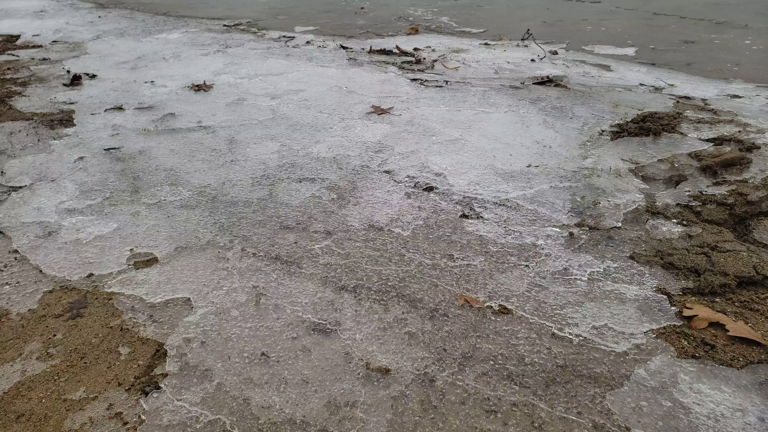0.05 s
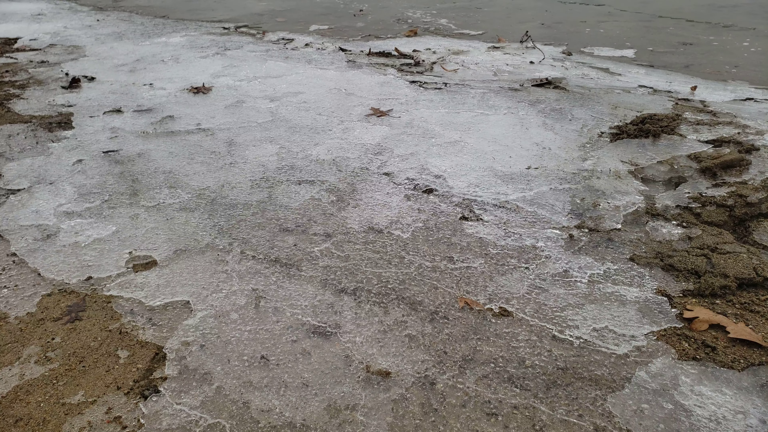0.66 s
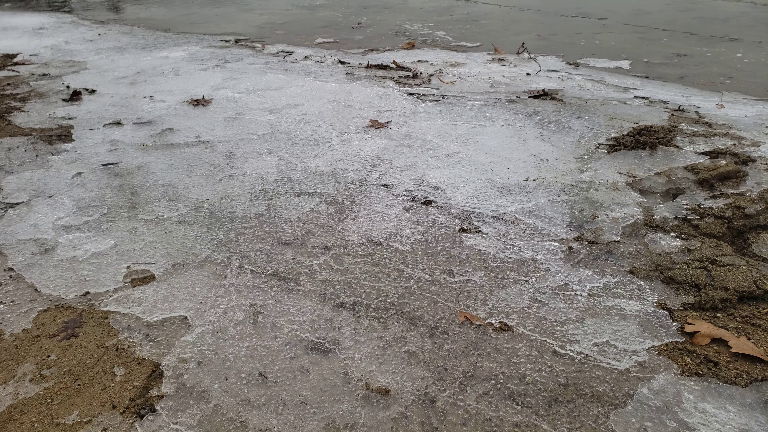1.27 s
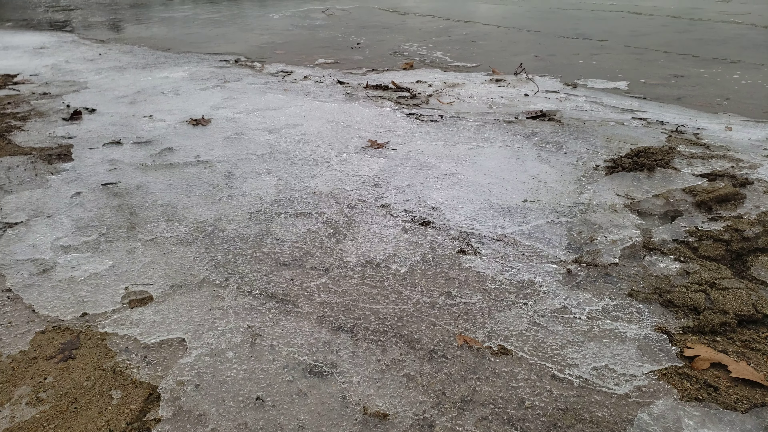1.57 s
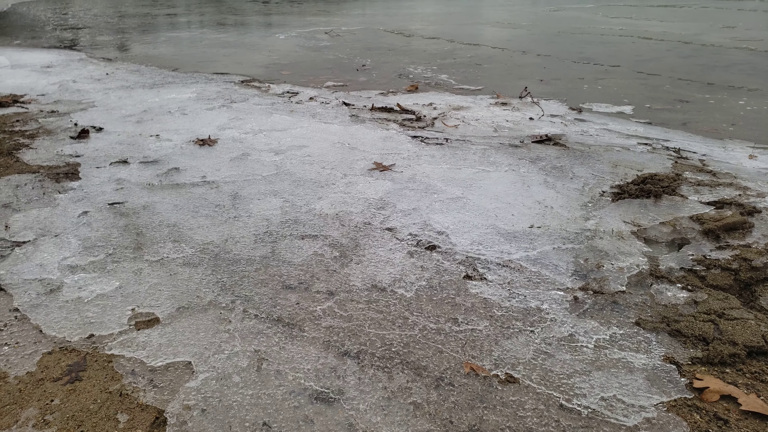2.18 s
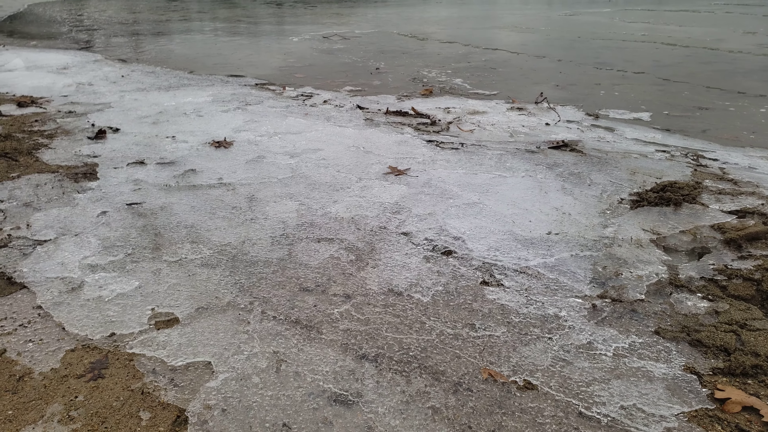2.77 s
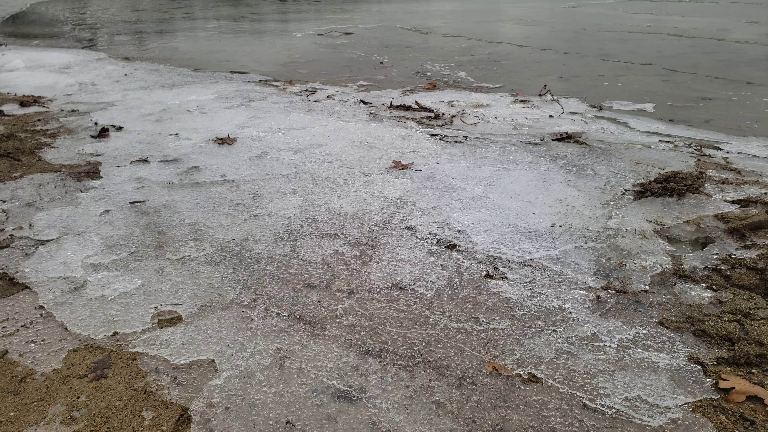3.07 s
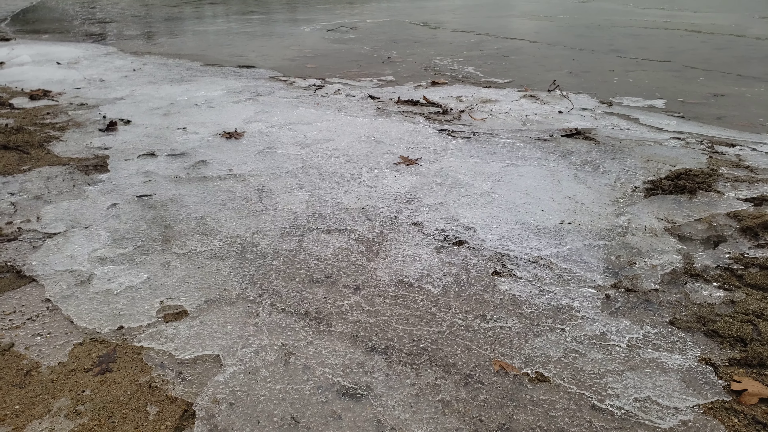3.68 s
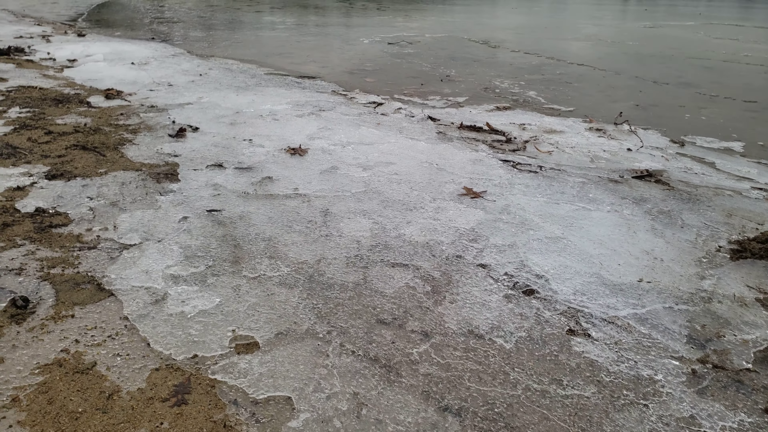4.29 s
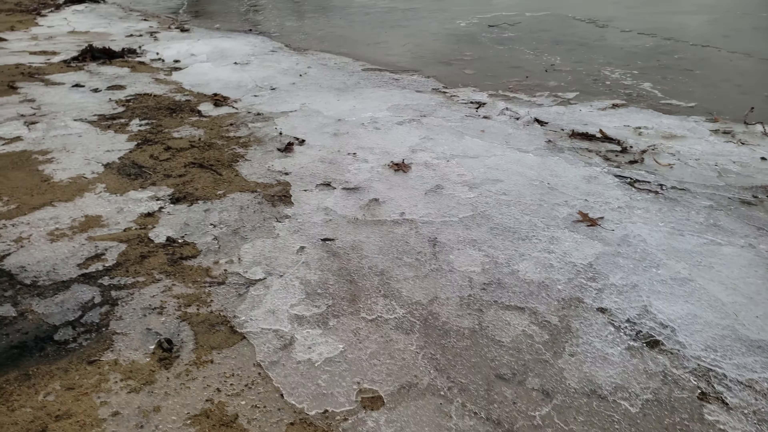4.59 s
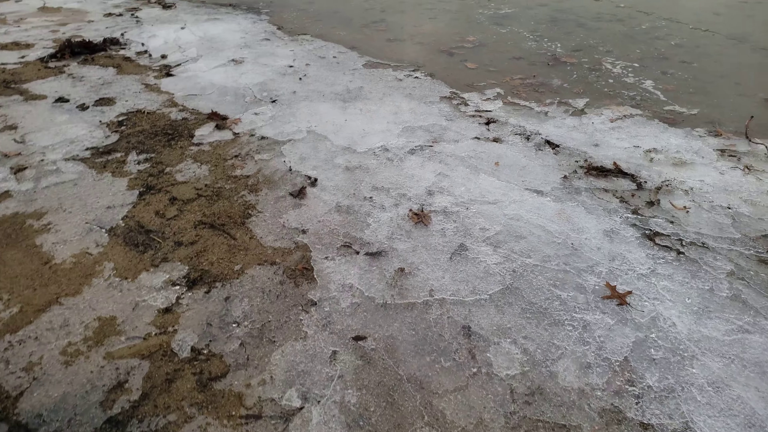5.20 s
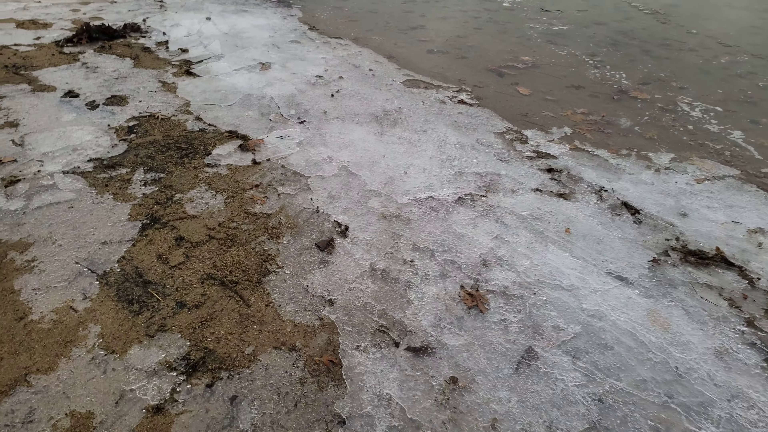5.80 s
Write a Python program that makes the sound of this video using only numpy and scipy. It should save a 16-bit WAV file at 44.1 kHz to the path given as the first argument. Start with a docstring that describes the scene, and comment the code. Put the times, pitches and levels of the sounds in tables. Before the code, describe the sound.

Low wind rumble comes in puffs on a microphone held near thin ice at the edge of a lake. Throughout, sleet-like grains land in bright, glassy ticks and little crackling flurries, with occasional faint chinks and dull knocks. Water gurgles quietly along the ice. Toward the end the gusts return, the gurgling and a distant wash swell slightly, and loose ice shards jostle.

```python
"""Icy grains on a frozen lake shore

Close to thin ice, on a hand-held camera with two microphone ports. Fine icy grains, likely sleet, tick
and crackle on ice, ground and camera, among chinks, dull knocks and two handling clicks. Water gurgles,
and a wash of distant air and water swells at the end. Gusts rumble on each port separately."""
import sys
import numpy as np
from scipy import signal
from scipy.fft import rfft, irfft, next_fast_len
from scipy.io import wavfile
from scipy.ndimage import uniform_filter1d

SR = 44100
rng = np.random.default_rng(int(sys.argv[2]) if len(sys.argv) > 2 else 0)


def put_to_file(sound):
    """Save the sound as 16-bit audio at rate SR, in the file named by the first command-line argument."""
    columns = np.atleast_2d(sound).T  # one column per channel
    safe = np.clip(columns, -1, 1)
    whole_steps = np.round(safe * 32767)
    wavfile.write(sys.argv[1], SR, whole_steps.astype(np.int16))


N = 257984
TIME = np.arange(N) / SR

# how strongly the icy grains crackle: time_s, relative_db
CRACKLE_LEVEL = [(0.12, -52.5), (0.6, -48.5), (1.0, -47), (1.3, -46), (1.8, -45), (2.42, -49),
                 (2.55, -53.5), (2.7, -49.5), (2.95, -51.5), (3.7, -51), (4.4, -52.5), (4.8, -45.5),
                 (5.05, -50.5), (5.43, -50.5), (5.58, -46), (5.85, -48.5)]
# flurries, when the crackle swells briefly: peak_s, boost_db
FLURRY_PEAKS = [(0.171, 11), (0.39, 6.5), (1.15, 1), (1.25, 3), (1.51, 2.5), (1.74, 1.5), (3.13, 5),
                (3.38, 5), (3.57, 2), (3.67, 4.5), (3.93, 2.5), (4.08, 2.5), (4.22, 5.5), (4.33, 4),
                (4.51, 5.5), (5.22, 2)]
# colour of the crackle: frequency_hz, relative_db
CRACKLE_SPECTRUM = [(1500, -4.5), (2400, -7), (3300, -7), (4300, -2), (5400, -4), (6800, -1.5),
                    (8400, -11.5), (9700, -6.5), (11000, -2), (12100, 1.5), (13500, 0), (15600, -6)]
def crackle(level_db=3.0, ticks_db=-7.0, clicks_db=-3.5, far_db=-4.0, clump_db=4.5):
    """Icy grains land near the microphone as glassy ticks or dry clicks; far ones merge into a fizz."""
    ticks = shower(count=2000, low_hz=2500, high_hz=16000, decay_s=.0016, octaves=.07, spread_db=3.6,
                   lag_ms=0.178, lag_spread_ms=0.492, scatter_db=-10.5, size=768)
    clicks = shower(count=1700, low_hz=2900, high_hz=15700, decay_s=0.00067, octaves=1.0, spread_db=1.0,
                    lag_ms=0.186, lag_spread_ms=0.298, scatter_db=-6.5, size=512)
    # the dry clicks come in clumps
    clumps = unit_rms(uniform_filter1d(rng.standard_normal(N), size=800))
    clicks *= gain_of(clump_db * np.minimum(clumps, 2))
    far = gain_of(far_db) * rng.standard_normal((2, N))
    grains = gain_of(ticks_db) * unit_rms(ticks) + gain_of(clicks_db) * unit_rms(clicks) + far
    flurries_db = sum(db * swell(s, half_width_s=0.046) for s, db in FLURRY_PEAKS)
    gain = gain_of(follow(CRACKLE_LEVEL)[0] + flurries_db + level_db)
    return gain * coloured(grains, CRACKLE_SPECTRUM)


# sharp ticks of grains close to the microphone: start_s, level_db, pitch_hz, decay_s
CLOSE_TICKS = [(0.1586, -37, 11900, .0036), (0.278, -36.5, 12500, 0.00041), (0.5876, -39, 12800, 0.00036),
               (1.302, -32.5, 12300, .0005), (1.3858, -30.5, 12500, .001), (1.4833, -37, 11300, .001),
               (1.52, -33.5, 6300, 0.00059), (1.7354, -32.5, 11600, 0.0015), (1.7427, -34.5, 7250, 0.00044),
               (1.7567, -25, 12600, 0.0027), (1.8185, -35, 12100, 0.0018), (1.8405, -40.5, 7460, 0.00069),
               (1.9418, -38.5, 7300, 0.00045), (2.1755, -43, 14100, .0007), (2.46, -28.5, 12000, 0.003),
               (2.464, -38.5, 7100, 0.0024), (2.5914, -33.5, 12600, 0.0022), (3.036, -49, 12200, 0.0011),
               (3.093, -38, 5860, 0.003), (3.1362, -36.5, 12000, 0.0028), (3.242, -44, 12100, 0.0018),
               (3.6558, -34, 12600, 0.0013), (4.002, -37, 13700, .0005), (4.0827, -30.5, 13600, 0.0011),
               (4.0972, -34, 13100, 0.0022), (4.1829, -41, 14300, .0004), (4.2136, -34, 12000, 0.0015),
               (4.4763, -33.5, 12700, 0.00062), (4.517, -33, 12500, .0009), (4.6506, -36.5, 11200, .0019),
               (4.834, -43, 7000, 0.0033), (5.198, -35.5, 11800, 0.0045), (5.2709, -38, 11100, .0016),
               (5.351, -39, 12900, 0.0024)]
def close_grains(tick_pan_db=0.5, body_db=-15, body_hz=5200):
    """Each close grain lands with a bright tick over a lower, weaker, wider click."""
    tick_rows = [(*row, tick_pan_db) for row in CLOSE_TICKS]
    body_rows = [(s, db + body_db, body_hz, decay_s, 0) for s, db, _, decay_s in CLOSE_TICKS]
    ticks = strikes(tick_rows, rise_s=.000088, octaves=.21, lag_ms=.411, scatter_db=-20, scatter_s=.0049)
    bodies = strikes(body_rows, rise_s=.0003, octaves=.64, lag_ms=.18, scatter_db=-14, scatter_s=.012)
    return ticks + bodies


# knocks and handling clicks: start_s, level_db, pitch_hz, decay_s, pan_db (left minus right), width_octaves
KNOCKS_AND_CLICKS = [(0.3986, -41.5, 1090, 0.00077, 9, 0.83), (0.882, -42, 1060, 0.0022, 4, 0.58),
                     (1.051, -41.5, 1260, .001, 3, 0.43), (1.1635, -38.5, 830, 0.0039, 8, 0.48),
                     (2.6666, -43.5, 740, .0044, 3, 0.62), (3.108, -41.5, 1200, .0025, 3, 1.3),
                     (3.706, -54, 780, 0.002, 3, 0.65), (4.4835, -39, 1490, 0.00081, 16, 1.8),
                     (4.4913, -36, 684, 0.00027, 12, 0.96), (5.4163, -39.5, 1500, .001, 3, 0.5),
                     (5.5569, -38.5, 1400, 0.00088, -1, 0.65), (5.6789, -39, 600, 0.002, 2, 0.76),
                     (5.7183, -40.5, 920, 0.0013, 4, 0.72)]
def knocks():
    """Dull knocks, and two sharp clicks from handling the camera near 4.49 s."""
    rows = np.array(KNOCKS_AND_CLICKS)
    widths = rows[:, -1, None, None]
    return strikes(rows[:, :-1], rise_s=.00047, octaves=widths, lag_ms=-.1, scatter_db=-16, scatter_s=.0055)


# thin plates of ice that chink: start_s, level_db
PLATE_CHINKS = [(0.175, -39), (1.1418, -37), (2.251, -41), (3.0343, -42), (3.6518, -39), (3.668, -46),
                (4.3245, -43.5), (4.642, -40.5)]
# loose shards jostling: time_s, level_db
JOSTLE_LEVEL = [(0.1, -58.5), (2.6, -61), (3.7, -55.5), (5.48, -67.5), (5.58, -47.5), (5.77, -47),
                (5.85, -59)]
def shards(pitch_hz=4320, decay_s=.0019, pan_db=-1.5):
    """Small plates of ice ring briefly in one narrow range: a few clear chinks over many faint ones."""
    faint = shower(count=1400, low_hz=4010, high_hz=4500, decay_s=0.0018, octaves=0.12, spread_db=1.0,
                   lag_ms=0., lag_spread_ms=0.41, scatter_db=10.0, size=1024)
    rows = [(s, db, pitch_hz, decay_s, pan_db) for s, db in PLATE_CHINKS]
    clear = strikes(rows, rise_s=0.0015, octaves=0.12, lag_ms=0.038, scatter_db=-18.5, scatter_s=0.039)
    return gain_of(follow(JOSTLE_LEVEL)[0]) * unit_rms(faint) + clear


# a thin high sizzle, a little to the left: time_s, level_db
SIZZLE_LEVEL = [(0.1, -54), (3.0, -56), (3.9, -58), (4.9, -59), (5.43, -52), (5.48, -40), (5.52, -48),
                (5.7, -47), (5.85, -52)]
def sizzle():
    """The very finest glassy ticks, crowded at the top of the treble."""
    ticks = shower(count=1200, low_hz=14100, high_hz=15700, decay_s=0.0014, octaves=0.058, spread_db=4.0,
                   lag_ms=0., lag_spread_ms=0.056, scatter_db=-10, size=768)
    return gain_of(follow(SIZZLE_LEVEL)[0]) * sides(pan_db=1.8)[:, None] * unit_rms(ticks)


# water at the edge of the ice: time_s, level_db, pan_db
GURGLE_LEVEL = [(0.1, -58.5, 4), (1.2, -66, 14), (1.55, -52, 3), (2.4, -61.5, 1.5), (4.4, -55, 2),
                (4.8, -48.5, -12), (5.35, -50, -12), (5.48, -61, 5), (5.62, -46.5, -2), (5.85, -51, -4)]
def gurgle():
    """Water moves along the ice in small dull plops."""
    plops = shower(count=700, low_hz=240, high_hz=676, decay_s=0.0024, octaves=0.52, spread_db=1.0,
                   lag_ms=-0.086, lag_spread_ms=0.4, scatter_db=-16.5, size=1024)
    level_db, pan_db = follow(GURGLE_LEVEL)
    return gain_of(level_db) * sides(pan_db) * unit_rms(plops)


# the steady breeze on the microphone: time_s, relative_db, pan_db
BREEZE_LEVEL = [(0.12, -45.5, 2), (0.5, -40, 0), (1.3, -41.5, -1.5), (1.7, -36.5, 2), (2.28, -37, 1),
                (2.48, -47.5, -11), (2.8, -41.5, -16), (3.1, -44.5, -1.5), (3.8, -45, 3.5), (4.05, -50, 4),
                (4.4, -43, -0.5), (4.8, -38, 14), (5.3, -37, 20), (5.48, -43.5, -5), (5.85, -46, 16)]
# gusts that rise above it and sink again: peak_s, half_width_s, relative_db, pan_db
GUST_PEAKS = [(0.22, 0.017, -45.5, 12), (0.41, 0.016, -44, 0), (0.67, 0.02, -34, -1),
              (0.9, 0.026, -32.5, -19), (1.15, 0.064, -35, 16), (1.43, 0.065, -33, 2),
              (1.63, 0.038, -37.5, -2), (1.852, 0.041, -25, 7.5), (2.008, .03, -26, 10),
              (2.098, 0.034, -28.5, -2), (2.21, 0.079, -29.5, 18), (2.631, 0.024, -36.5, 0),
              (2.93, 0.015, -38.5, 8), (3.34, 0.013, -37, -2), (3.63, 0.018, -39.5, 5),
              (3.9, 0.055, -38.5, -2), (4.583, 0.031, -32, -1.5), (4.698, 0.036, -32, 2),
              (5.08, 0.048, -31.5, 5.5), (5.201, 0.016, -29.5, -4)]
# colour of the wind rumble: frequency_hz, relative_db
RUMBLE_SPECTRUM = [(12, -34), (20, -27), (49, 3), (83, 1.5), (108, -0.5), (240, -13.5), (286, -17.5),
                   (433, -26.5), (720, -57), (900, -43), (1170, -66), (1980, -120)]
# small eddies, the roughness of the flow over the ports: time_s, relative_db, pan_db
ROUGHNESS = [(0.1, -3, -1), (1.5, -13.5, 2), (2.1, -5, -9), (3.2, -3.5, -1), (4.44, 2, -2), (4.56, 8.5, 1),
             (4.7, 10, -4.5), (4.85, 6.5, -16.5), (5.25, 0.5, -7), (5.85, -14, -4)]
def wind(level_db=3.5, small_eddy_hz=190, brighten=0.6, calm_db=-31, flutter_db=3.5, port_flutter_db=2.5):
    """Each port has its own turbulence, in puffs; stronger gusts shed smaller eddies and sound brighter."""
    breeze_db, pan_db = follow(BREEZE_LEVEL)
    drift = uniform_filter1d(uniform_filter1d(rng.standard_normal((3, N)), size=1700), size=800)
    shared, *per_port = [unit_rms(row) for row in drift]
    puffs_db = breeze_db + flutter_db * shared + port_flutter_db * np.array(per_port)
    power = (gain_of(puffs_db) * sides(pan_db)) ** 2
    for s, half_width_s, db, side_db in GUST_PEAKS:
        power += (gain_of(db) * sides(side_db)[:, None]) ** 2 * swell(s, half_width_s)
    push = np.sqrt(power)
    eddies = coloured(rng.standard_normal((2, N)), RUMBLE_SPECTRUM)
    eddies /= np.sqrt(uniform_filter1d(eddies ** 2, size=3000, axis=1) + 1e-6)  # hold the level steady
    large = signal.sosfiltfilt(signal.butter(2, small_eddy_hz, fs=SR, output="sos"), eddies)
    rough_db, rough_pan_db = follow(ROUGHNESS)
    brightness = (push / gain_of(calm_db)) ** brighten
    small = (eddies - large) * gain_of(rough_db) * sides(rough_pan_db) * brightness
    return gain_of(level_db) * push * (large + small)


# single eddies that slap the microphone: start_s, relative_db, pitch_hz, pan_db
EDDY_SLAPS = [(0.601, -15.5, 62.5, 32), (0.892, -27, 139.4, -21), (1.836, -11.5, 84, 27),
              (1.865, -29, 55, 20), (2.602, -21.5, 95.5, 0), (3.166, -30.5, 104, 5), (4.313, -25, 83, 3),
              (4.57, -16.5, 102, -2), (4.663, -24, 220.6, 0), (4.68, -17, 64.4, -1)]
def buffets(level_db=-3, length_s=0.036):
    """A passing eddy pushes and pulls at the ports for a few swings."""
    out, t = np.zeros((2, N)), np.arange(0, length_s, 1 / SR)
    for s, db, hz, pan_db in EDDY_SLAPS:
        swing = np.sin(2 * np.pi * (hz * t + rng.random())) * np.hanning(len(t))
        add(out, s, gain_of(db + level_db) * sides(pan_db)[:, None] * swing)
    return out


# the open shore, for both wash and grit: time_s, relative_db
SHORE_LEVEL = [(0.12, -55.5), (0.75, -52), (1.3, -54.5), (1.72, -52), (1.95, -57), (2.3, -53),
               (2.55, -58.5), (2.68, -56.5), (2.85, -57.5), (3.9, -58.5), (4.45, -57.5), (4.9, -51.5),
               (5.47, -54.5), (5.72, -49), (5.85, -54)]
# colour of the distant wash: frequency_hz, relative_db
WASH_SPECTRUM = [(40, -21.5), (150, 3), (300, -9), (450, -1), (720, -7), (1100, -5), (1550, -7.5),
                 (1950, -13), (3000, -10.5), (4300, -13), (8000, -19), (16000, -15)]
# how alike the wash is at the two ports: frequency_hz, coherence (0 to 1)
WASH_COHERENCE = [(60, 1), (300, 0.42), (650, 1), (1400, 0), (2500, 0.15), (16000, 0.075)]
def wash(level_db=5.5, patchy_db=3.5, lead_ms=0.098, lap_db=3.0):
    """Distant air and water in drifting patches, reaching the left port first and swelling at each knock."""
    frames, hz = N // 256 + 5, np.fft.rfftfreq(512, 1 / SR)
    *noise, patches = rng.standard_normal((5, frames, len(hz))).transpose(0, 2, 1)
    patches = unit_rms(uniform_filter1d(uniform_filter1d(patches, size=5, axis=0), size=5, axis=1))
    left, unrelated = noise[0] + 1j * noise[1], noise[2] + 1j * noise[3]
    coherence = value_at(WASH_COHERENCE, hz)[:, None]
    delay = np.exp(-2j * np.pi * hz * lead_ms / 1000)[:, None]
    right = delay * coherence * left + np.sqrt(1 - coherence ** 2) * unrelated
    spectra = np.array([left, right]) * gain_of(value_at(WASH_SPECTRUM, hz)[:, None] + patchy_db * patches)
    air = unit_rms(signal.istft(spectra, window="cosine", nperseg=512)[1][:, :N])
    laps = np.max([swell(s, half_width_s=0.036) for s, *_ in KNOCKS_AND_CLICKS], axis=0)
    return gain_of(follow(SHORE_LEVEL)[0] + lap_db * laps + level_db) * air


def grit(level_db=-6.0):
    """Faint dry clicks from the coarser ice, scattered through the wash."""
    clicks = shower(count=450, low_hz=700, high_hz=3250, decay_s=0.00073, octaves=0.77, spread_db=2.5,
                    lag_ms=0., lag_spread_ms=0.26, scatter_db=-8, size=512)
    return gain_of(follow(SHORE_LEVEL)[0] + level_db) * unit_rms(clicks)


# unequal shading of the two ports, at its fullest: frequency_hz, pan_db
PORT_SHADE = [(150, -10), (400, 0.5), (1000, 4.5), (2200, 5.5), (3200, 3), (4300, -2.5), (5500, 0),
              (7200, 8.5), (8200, -2), (9500, -7), (12000, -9), (13800, 1), (16000, -11)]
# how much of that shading applies: time_s, share (0 to 1)
SHADE_SHARE = [(0.1, 0.88), (1.8, 0.93), (2.3, 0.85), (2.45, 0.17), (4.4, 0.23), (5.85, 0.11)]
def shaded(x):
    """The camera body and hand shade the two ports differently; this fades as the camera turns."""
    hz, t, spectra = signal.stft(x, SR, nperseg=256)
    pan_db = value_at(PORT_SHADE, hz)[:, None] * follow(SHADE_SHARE, t)[0]
    return signal.istft(spectra * sides(pan_db), SR, nperseg=256)[1][:, :N]


def bursts(hz, rise_s, decay_s, lag_ms, octaves, scatter_db, scatter_s, size):
    """Dying noise bursts around hz, lag_ms late at the left port, with scatter off the ground."""
    t = np.arange(size) / SR - .001  # 1 ms of room ahead of the onset
    f = np.fft.rfftfreq(size, 1 / SR) + 1
    attack = 1 - np.exp(-(np.maximum(t, 0) / rise_s) ** 2)
    noise = rng.standard_normal((len(hz), 3, size)) * attack
    direct = rfft(noise[:, :1] * np.exp(-abs(t) / decay_s[:, None, None]))
    delay = np.exp(-2j * np.pi * f * lag_ms[:, None, None] * np.array([[.5], [-.5]]) / 1000)
    scatter = rfft(noise[:, 1:] * np.exp(-abs(t) / scatter_s)) * gain_of(scatter_db)
    band = 1 / (1 + (np.log2(f / hz[:, None, None]) / octaves) ** 4) ** .5
    sounds = irfft((direct * delay + scatter) * band, size)  # (events, ports, samples)
    energy = np.mean(np.sum(sounds ** 2, axis=2), axis=1)
    return sounds / np.sqrt(energy)[:, None, None]


def shower(count, low_hz, high_hz, decay_s, octaves, spread_db, lag_ms, lag_spread_ms, scatter_db, size):
    """Many bursts at random moments, from 240 spots of their own pitch; most are small, a few large."""
    hz = np.linspace(low_hz, high_hz, 240)
    place, length = rng.random((2, len(hz)))
    lags_ms = lag_ms + lag_spread_ms * (2 * place - 1)
    grains = bursts(hz, 2 * decay_s, decay_s * (.5 + length), lags_ms, octaves, scatter_db, 2 * decay_s, size)
    when, spot, rank = rng.random((count, 3)).T
    heights = gain_of(spread_db * np.minimum(-np.log(1 - rank), 4))
    samples = (when * N).astype(int)[:, None] + np.arange(size)
    sounds = grains[(spot * len(hz)).astype(int)] * heights[:, None, None]
    return np.array([np.bincount(samples.ravel(), sounds[:, port].ravel(), N)[:N] for port in range(2)])


def strikes(rows, rise_s, octaves, lag_ms, scatter_db, scatter_s):
    """One burst a row; its level is that of its energy spread over 5 ms."""
    start_s, level_db, hz, decay_s, pan_db = np.transpose(rows)
    sounds = bursts(hz, rise_s, decay_s, np.full(len(hz), lag_ms), octaves, scatter_db, scatter_s, 2048)
    out = np.zeros((2, N))
    for s, db, side_db, sound in zip(start_s, level_db, pan_db, sounds):
        add(out, s - .001, sound * gain_of(db) * np.sqrt(.005 * SR) * sides(side_db)[:, None])
    return out


def gain_of(db):
    """Decibels to amplitude."""
    return 10 ** (np.asarray(db) / 20)


def unit_rms(x):
    """Scales to rms 1."""
    return x / np.sqrt(np.mean(x ** 2) + 1e-20)


def value_at(spectrum, hz):
    """A spectrum's value at hz, on a log-frequency axis."""
    f, value = np.transpose(spectrum)
    return np.interp(np.log(hz + 1), np.log(f + 1), value)


def follow(rows, t=TIME):
    """Each column of a curve at the times t."""
    s, *columns = np.transpose(rows)
    return [np.interp(t, s, column) for column in columns]


def swell(s, half_width_s):
    """A smooth rise and fall of height 1 around time s."""
    return np.exp(-((TIME - s) / half_width_s) ** 2)


def sides(pan_db):
    """Left and right gains of constant power; pan_db is left minus right."""
    pair = gain_of(np.array([pan_db, -pan_db]) / 2)
    return pair / np.sqrt(np.mean(pair ** 2, axis=0))


def add(mix, s, sound):
    """Mixes a stereo sound in at time s."""
    part = mix[:, max(round(s * SR), 0):][:, :sound.shape[1]]
    part += sound[:, :part.shape[1]]


def coloured(x, spectrum):
    """Filters by a spectrum; rms 1."""
    size = next_fast_len(N)
    gains = gain_of(value_at(spectrum, np.fft.rfftfreq(size, 1 / SR)))
    return unit_rms(irfft(rfft(x, size) * gains, size)[:, :N])


def scene():
    """Icy grains, water and wind, heard from the shore."""
    grains_and_wash = shaded(crackle() + close_grains() + grit() + wash())
    return grains_and_wash + knocks() + shards() + sizzle() + gurgle() + wind() + buffets()


def record(dry, opens_s=0.117, cutoff_hz=15850):
    """The microphone opens a moment late, and the highest treble is cut off."""
    opened = dry * np.clip((TIME - opens_s) / .003, 0, 1)
    lowpass = signal.firwin(511, cutoff_hz, window=("kaiser", 9), fs=SR)
    return signal.oaconvolve(opened, lowpass[None], "same")


dry = scene()
out = record(dry)
put_to_file(out)
```